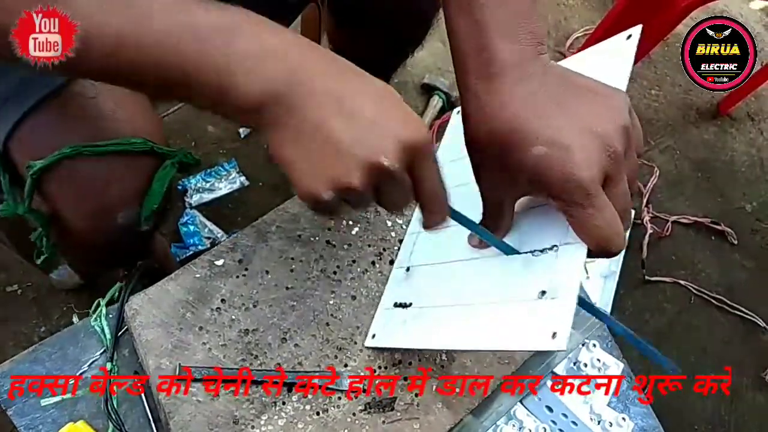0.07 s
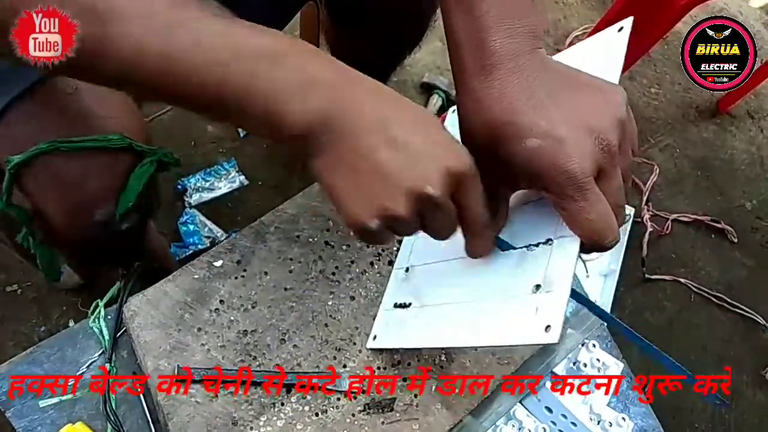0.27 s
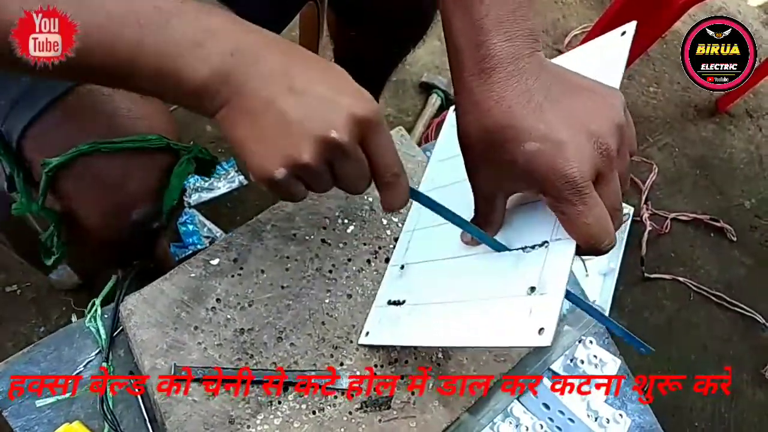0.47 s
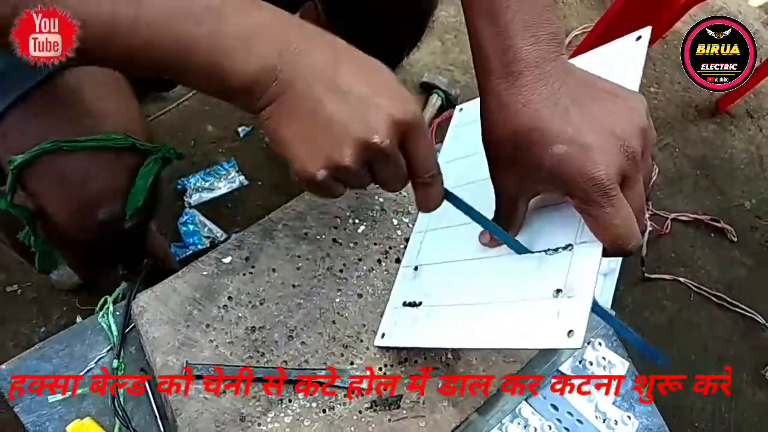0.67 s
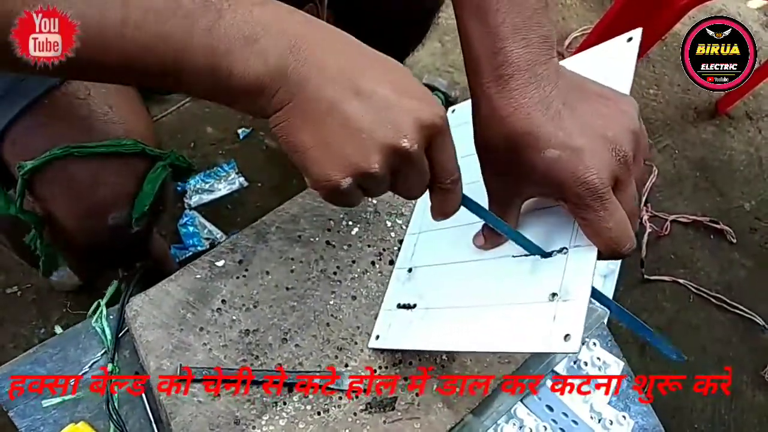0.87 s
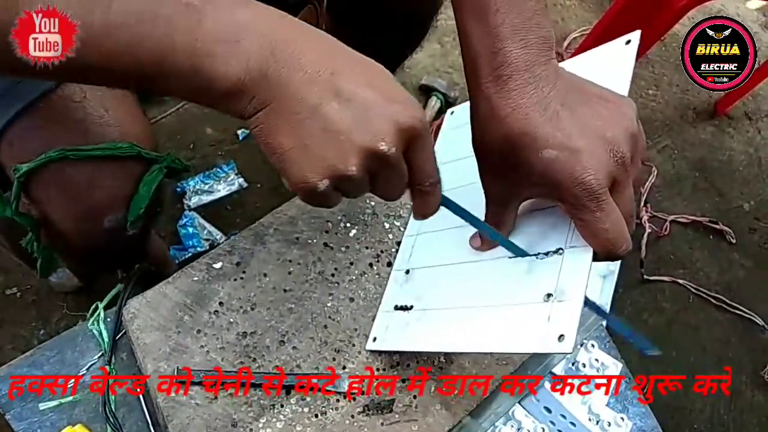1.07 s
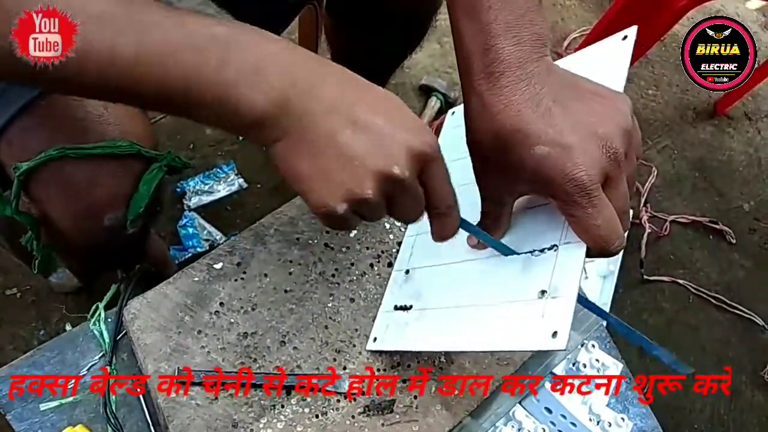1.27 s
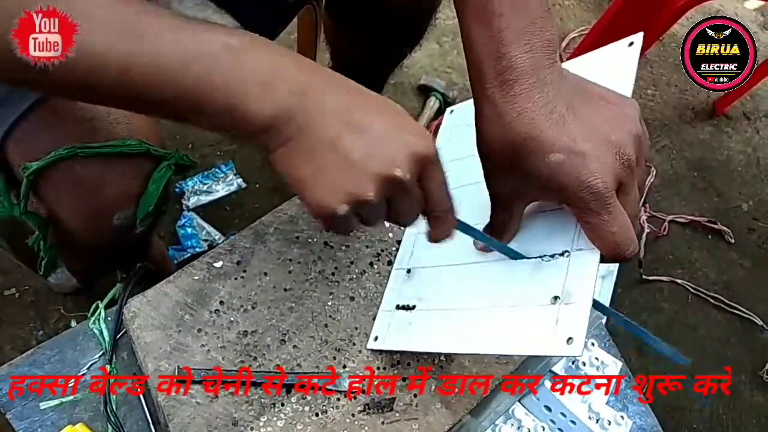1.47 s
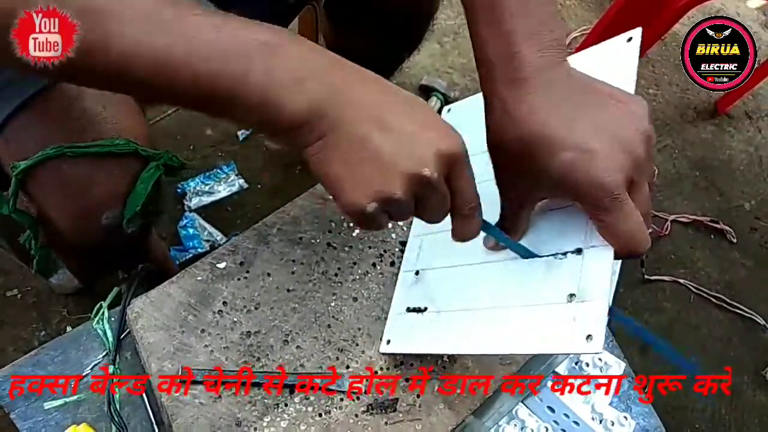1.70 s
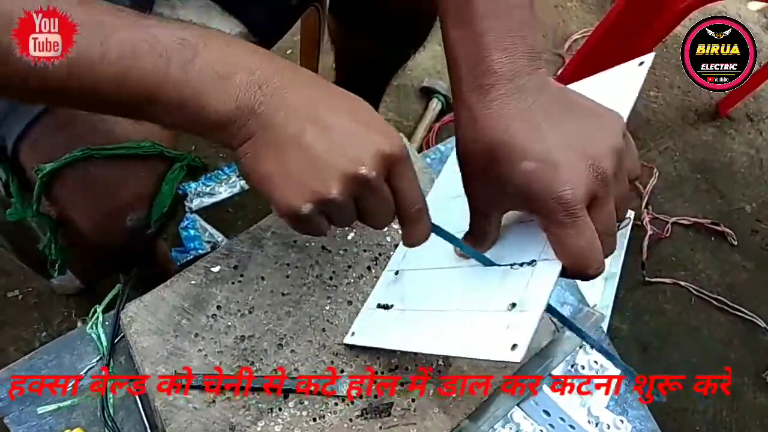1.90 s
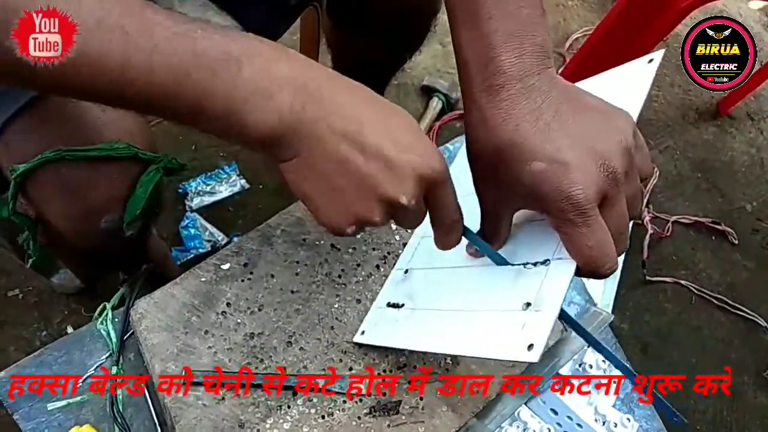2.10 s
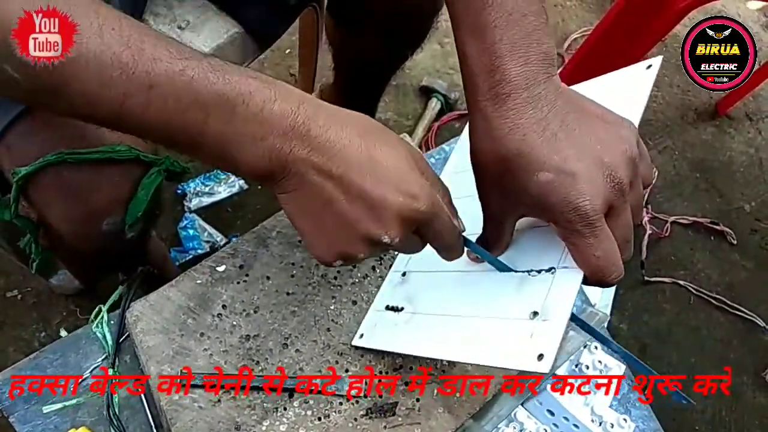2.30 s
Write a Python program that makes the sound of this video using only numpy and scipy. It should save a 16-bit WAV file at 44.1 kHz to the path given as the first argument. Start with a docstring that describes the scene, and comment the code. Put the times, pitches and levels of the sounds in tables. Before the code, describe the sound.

Close to the microphone outdoors, a thin saw blade cuts plastic in short, uneven, gritty strokes. After a half-second lull the sawing picks up again with sharp clicks as the teeth catch, over faint still air.

```python
"""Loud, bright rasps and lighter pulls: a bare hacksaw blade is worked by hand through a plastic sheet.
Each tooth chips the edge, and this train of impulses excites the resonances of sheet and thin blade.
The sawing almost rests for half a second, then the blade snags and knocks in the slot as it restarts.
The sound is close, scattered by the hands and the slab under the sheet; a small yard answers briefly."""
import sys
import numpy as np
from scipy import signal
from scipy.fft import rfft, irfft
from scipy.io import wavfile
from scipy.ndimage import uniform_filter1d

SR = 44100
rng = np.random.default_rng(int(sys.argv[2]) if len(sys.argv) > 2 else 0)


def bounce(signal):
    """Save signal as a 16-bit WAV file at the path given by the first command-line argument."""
    frames = np.transpose(np.atleast_2d(signal))
    limited = np.clip(frames, -1, 1)
    pcm = np.round(limited * 32767).astype(np.int16)
    wavfile.write(sys.argv[1], SR, pcm)


N = 108045

# Spectrum of chipping plastic: frequency_hz, gain_db
CHIP_SPECTRUM = [(100, -2), (300, -2), (450, -3), (800, -1), (2400, -8), (3100, -5.5), (4500, 0.5),
                 (5600, -6.5), (6500, -10.5), (8000, -3.5), (10500, -1.5), (13500, -5.5), (16000, -3.5)]
# Cutting strokes, levels relative: start_s, crest_s, end_s, start_db, crest_db, end_db, top_tooth_rate_hz
PUSH_STROKES = [(.092, .158, .172, -21, -14, -15, 2900), (.433, .46, .533, -20, -20, -28, 1500),
                (.744, .808, .852, -22, -13, -20, 2200), (1.831, 1.925, 1.955, -26, -15, -19, 1700),
                (2.179, 2.186, 2.198, -23, -22, -29, 1800)]
def pushes():
    """Forced vibration: chipping teeth drive blade and sheet; the sheet judders as the stroke stalls."""
    force, whine, progress = strokes(PUSH_STROKES, grit=0.8, jitter=.2)
    stall = (1 + np.tanh((progress - 0.74) / 0.14)) / 2  # rises from 0 to 1 late in the stroke
    rasp = undb(-0.5) * unit(minimum_phase(curve(CHIP_SPECTRUM))) + undb(-6) * blade_response()
    judder = through(force * undb(6 * stall), sheet_response())
    return through(force, rasp) + undb(-7.5) * judder + undb(-17) * stall * whine


# Spectrum of teeth skating on the edge: frequency_hz, gain_db
SKATE_SPECTRUM = [(100, 6), (250, -1.5), (420, -1.5), (750, 1), (1450, 1), (2400, -2.5), (3200, -8.5),
                  (4700, 0), (6500, -11.5), (9500, -3), (12000, -8.5), (16000, -5.5)]
# Light strokes, levels relative: start_s, crest_s, end_s, start_db, crest_db, end_db, top_tooth_rate_hz
SKIM_STROKES = [(-.04, .012, 0.039, -25, -24, -31.5, 1592), (.077, .086, .093, -22.5, -33, -34, 2387),
                (.259, .275, 0.29, -37, -39, -34.5, 1600), (.302, .328, 0.36, -29, -23.5, -35.5, 1552),
                (.567, .648, 0.69, -31, -24, -37, 1700), (.722, .735, 0.79, -38, -27.5, -27.5, 2405),
                (.86, .91, .99, -37, -48, -54, 1200), (1.19, 1.22, 1.28, -52.5, -51.5, -55.5, 2400),
                (1.459, 1.485, 1.526, -53, -34.5, -42.5, 2200), (1.58, 1.685, 1.748, -58, -29, -33.5, 1606),
                (2.01, 2.05, 2.096, -29.5, -27, -30, 1001), (2.362, 2.38, 2.384, -53, -43, -53, 1503)]
def skims():
    """Resonance: skating teeth give a duller zip, and the sheet sings as their rate nears its own pitch."""
    force, whine, _ = strokes(SKIM_STROKES, grit=1, jitter=.13)
    skate = undb(-0.5) * unit(minimum_phase(curve(SKATE_SPECTRUM)))
    colour = skate + undb(-16.5) * sheet_response() + undb(-17) * blade_response()
    return through(force, colour) + through(whine, resonance(pitch_hz=1440, width_hz=390, gain_db=-6.5))


# Spectrum of a knock in the slot: frequency_hz, gain_db
KNOCK_SPECTRUM = [(100, -19), (250, -2), (420, -7.5), (750, 3), (1400, -1), (2400, -1), (3200, -12),
                  (4700, -1.5), (6500, -15), (9500, 0.5), (13000, -11.5), (16000, -3)]
# Snags of the blade: start_s, relative_level_db, treble_over_middle_db
SNAGS = [(0.093, -18.5, 8.5), (0.168, -4.5, -16), (0.323, -15, -12), (0.353, -10.5, -23), (.434, -6, -23),
         (0.525, -21, -9), (.584, -14.5, -1.5), (0.736, -15.5, 4), (.746, -14.5, 0), (.899, -21.5, 2),
         (1.244, -30, 5.5), (1.505, -12, -4), (1.52, -21.5, 3.5), (1.603, -22.5, -7), (1.643, -10, -11),
         (1.698, -10, 3), (1.714, -21.5, -23), (1.797, -30.5, -16), (1.922, -11.5, -4), (1.935, -9, -5),
         (1.946, -13, -3), (2.011, -16, 3), (2.073, -12, -1), (2.141, -23, -5), (2.179, -11.5, 2.5),
         (2.195, -4, -1.5), (2.381, -26.5, 6.5), (2.394, -22.5, -7), (2.425, -19, -26)]
def knocks(decay_s=0.0019, crossover_hz=2270):
    """Impulse excitation: a snagged tooth lets go with a short crack that rings the sheet."""
    t = np.arange(N) / SR
    noise, middle, treble = rng.standard_normal(N), np.zeros(N), np.zeros(N)
    for start_s, level_db, treble_db in SNAGS:
        crack = noise * (t >= start_s) * np.exp(-np.abs(t - start_s) / decay_s) * undb(level_db - 2.5)
        middle += crack
        treble += crack * undb(treble_db)
    colour = unit(minimum_phase(curve(KNOCK_SPECTRUM)))
    lowpass = 1 / (1 + 1j * bins() / crossover_hz)
    body = through(middle, colour * lowpass + undb(-11) * sheet_response())
    return body + through(treble, colour * (1 - lowpass))


def strokes(table, grit, jitter, attack_s=0.0017, release_s=.004):
    """Tooth rate is proportional to hand speed, which rises, then falls; gives force, whine, progress."""
    t = np.arange(N) / SR
    fastest_at, end_speed = .3, .5  # shares of the stroke and of top speed
    envelope, progress, rate_hz = np.zeros(N), np.zeros(N), np.full(N, SR / 40)
    for start, crest, end, start_db, crest_db, end_db, top_hz in table:
        gate = np.clip((t - start) / attack_s, 0, 1) * np.exp(-np.maximum(t - end, 0) / release_s)
        envelope += gate * undb(np.interp(t, [start, crest, end], [start_db, crest_db, end_db]))
        along = np.clip((t - start) / (end - start), 0, 1)
        speed = 1 - (1 - end_speed) * np.abs((along - fastest_at) / (1 - fastest_at)) ** 3
        progress = np.where(t >= start, along, progress)
        rate_hz = np.where(t >= start, top_hz * speed, rate_hz)
    contact = teeth(rate_hz, grit, jitter)
    catching = unit(undb(1.2 * wander(hz=260)))
    force, whine = envelope * contact * catching
    return force, whine, progress


def teeth(rate_hz, grit, jitter, scatter_db=2.5):
    """A quasi-periodic impulse train: a click and a puff of grit per tooth, and a tone at their rate."""
    passed = np.cumsum(rate_hz * np.exp(jitter * wander(hz=900)) / SR)
    tooth = passed.astype(int)
    size = undb(scatter_db * rng.standard_normal(N))[tooth]
    clicks = np.diff(tooth, prepend=0) * np.sqrt(SR / rate_hz) - np.sqrt(rate_hz / SR)  # zero mean
    crumbs = unit(np.exp(-(passed % 1) / 0.55) * rng.standard_normal(N))
    force = unit(size * (clicks + grit * crumbs))
    whine = unit(size * np.sin(2 * np.pi * passed))
    return np.array([force, whine])


# Modes of the plastic sheet: pitch_hz, width_hz, gain_db
SHEET_MODES = [(230, 45, -5), (285, 68, 1), (597, 100, -3.5), (722, 88, 2), (1022, 67, -5.5),
               (1305, 90, -3.5), (1400, 85, -22.5), (2187, 270, -6)]
def sheet_response():
    """Modal superposition: the sheet responds as a sum of damped low and middle resonances."""
    return unit(sum(resonance(*mode) for mode in SHEET_MODES))


# Modes of the thin blade: pitch_hz, width_hz, gain_db
BLADE_MODES = [(4740, 250, -31.5), (5440, 220, 3), (7740, 380, 0.5), (9040, 190, 6), (10060, 160, 2),
               (11540, 260, -2.5), (12880, 160, 0), (13570, 400, -0.5)]
def blade_response():
    """Modal superposition: the blade's high resonances add up to a metallic ring."""
    return unit(sum(resonance(*mode) for mode in BLADE_MODES))


# Spectrum of the wall reflections: frequency_hz, gain_db
WALL_SPECTRUM = [(100, -1.5), (250, -0.5), (800, -9.5), (2000, -5.5), (6500, -12), (10000, -7.5),
                 (16000, -21.5)]
# Level difference between the channels: frequency_hz, left_over_right_db
STEREO_BALANCE = [(60, -3), (200, -5.5), (320, 0.5), (750, -2), (1400, -6), (2200, -0.5), (3500, 0),
                  (4800, -5.5), (7000, -2.5), (9000, -2.5), (11000, 3), (14000, 1)]
def yard(sound, early_t60_s=0.16, late_t60_s=0.66, wall_delay_s=.005, right_lag_s=.00002):
    """Reverberation: the direct sound is joined by near scatter and a decaying echo off the walls."""
    t = np.arange(N) / SR
    direct = np.exp(1j * np.pi * bins() * right_lag_s * np.array([[1], [-1]]))
    fade = undb(-60 * t / early_t60_s) + undb(-21 - 60 * t / late_t60_s)
    walls = reflections(fade * (t > wall_delay_s)) * minimum_phase(curve(WALL_SPECTRUM))
    arriving = through(sound, direct + walls) + undb(1.5) * slab_scatter(sound)
    balance = curve(STEREO_BALANCE) ** np.array([[.5], [-.5]])
    return through(arriving, balance * undb(-1.5))


def slab_scatter(sound, decay_s=0.0033, highpass_hz=910, motion_hz=4.5):
    """Scattering off slab and hands: two reflection patterns crossfade as hands and blade move."""
    t = np.arange(N) / SR
    turn = 2 * np.pi * motion_hz * t
    highpass = 1 / (1 + highpass_hz / (1j * bins()))
    return sum(through(sound * share, reflections(np.exp(-t / decay_s)) * highpass)
               for share in (np.cos(turn), np.sin(turn)))


def reflections(envelope):
    """A diffuse field: dense random echoes under an envelope, as a unit-power response for two ears."""
    return unit(rfft(rng.standard_normal((2, N)) * envelope, 2 * N))


# Spectrum of the still outdoor air: frequency_hz, gain_db
AIR_SPECTRUM = [(20, 0), (45, -3), (90, -13), (150, -24), (240, -17), (420, -26), (560, -23.5), (1000, -31),
                (1500, -39), (3000, -39), (7000, -43), (10000, -40.5), (16000, -50)]
def air(level_db=-47.5, stereo_width=.22):
    """Ambient noise: a low rumble under a faint hiss, partly correlated between the ears."""
    mid, side = (unit(through(rng.standard_normal(N), curve(AIR_SPECTRUM))) for _ in range(2))
    return undb(level_db + 1.7 * wander(hz=5.2)) * (mid + stereo_width * side * np.array([[1], [-1]]))


def undb(db):
    """Decibels to amplitude ratio."""
    return 10 ** (np.asarray(db) / 20)


def unit(x):
    """Normalisation to rms 1."""
    return x / np.sqrt(np.mean(np.abs(x) ** 2))


def bins():
    """Frequencies of the filter grid in Hz."""
    return np.maximum(np.arange(N + 1) * SR / (2 * N), 1)


def curve(points):
    """Gain interpolated over log frequency from (frequency_hz, gain_db) points."""
    hz, db = np.array(points, float).T
    return undb(np.interp(np.log(bins()), np.log(hz), db))


def minimum_phase(gain):
    """Causality: folding the cepstrum gives the promptest response with this gain."""
    cepstrum = irfft(np.log(gain))
    return np.exp(rfft(np.r_[cepstrum[0], 2 * cepstrum[1:N]], 2 * N))


def resonance(pitch_hz, width_hz, gain_db):
    """Frequency response of a damped harmonic oscillator."""
    f = bins()
    return undb(gain_db) / (1 + 1j * pitch_hz / width_hz * (f / pitch_hz - pitch_hz / f))


def through(x, response):
    """Convolution as a product of spectra."""
    return irfft(rfft(x, 2 * N) * response)[..., :N]


def wander(hz):
    """Smooth random fluctuation with rms 1."""
    hold = max(int(SR / hz), 1)
    steps = np.repeat(rng.standard_normal(N // hold + 1), hold)
    return unit(uniform_filter1d(steps, hold)[:N])


def scene():
    """Superposition: the sawing sounds in its yard, over the outdoor air."""
    return yard(pushes() + skims() + knocks()) + air()


def record(dry):
    """Nonlinearity: loud sound pushes the microphone off centre; peaks clip and the top treble is cut."""
    swing_band = signal.butter(1, [2.5, 6.87], "bandpass", fs=SR, output="sos")
    swing = signal.sosfilt(swing_band, np.mean(dry ** 2, axis=0))
    clipped = np.clip(dry - undb(1.5) * swing, -1, 1)
    lowpass = signal.ellip(10, .2, 70, 15550, fs=SR, output="sos")
    return signal.sosfilt(lowpass, clipped)


dry = scene()
out = record(dry)
bounce(out)
```